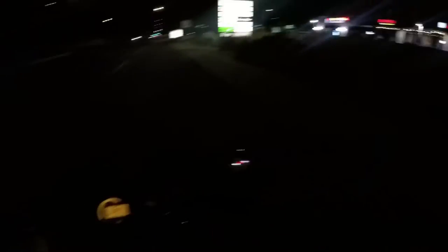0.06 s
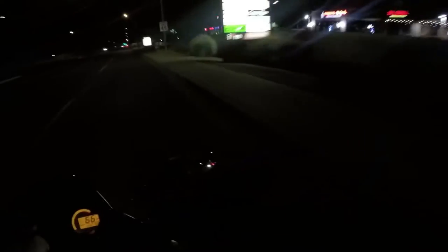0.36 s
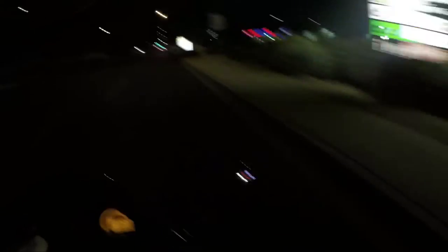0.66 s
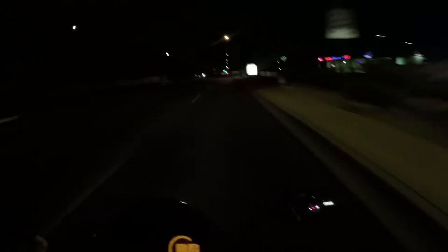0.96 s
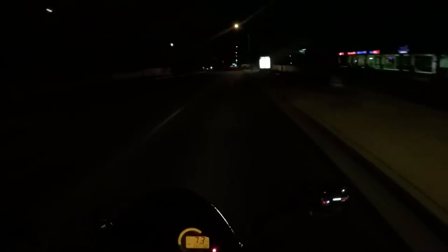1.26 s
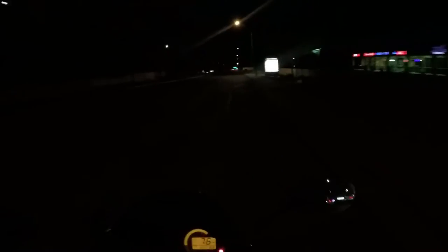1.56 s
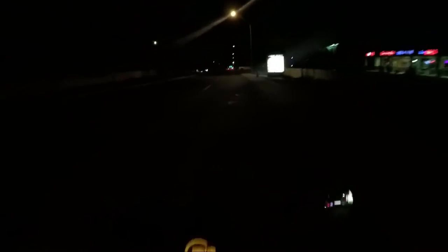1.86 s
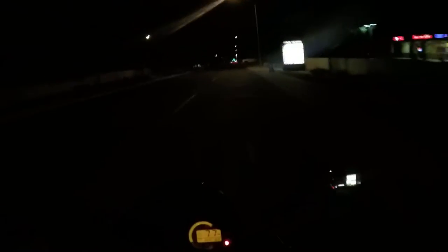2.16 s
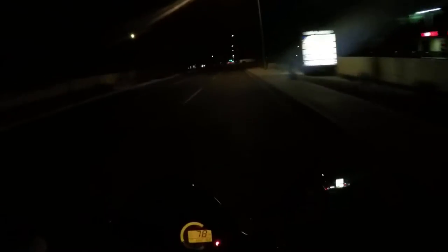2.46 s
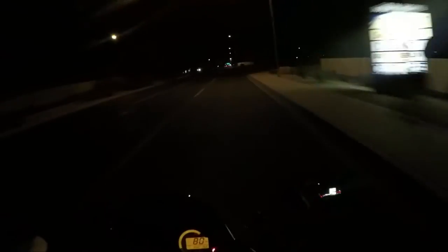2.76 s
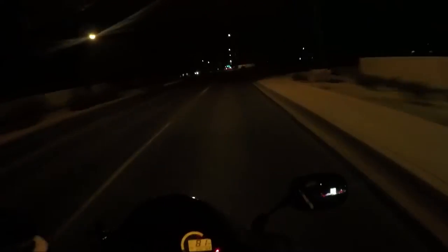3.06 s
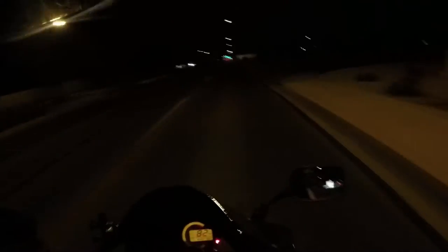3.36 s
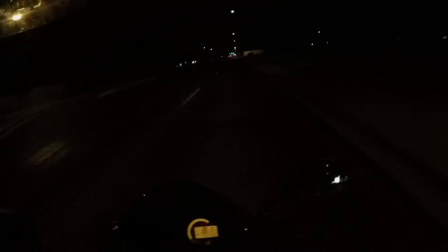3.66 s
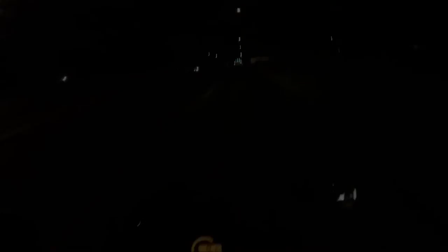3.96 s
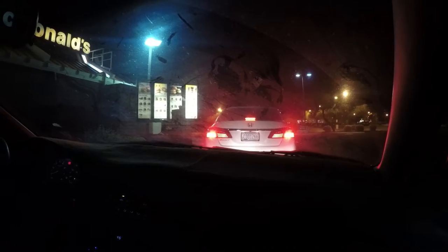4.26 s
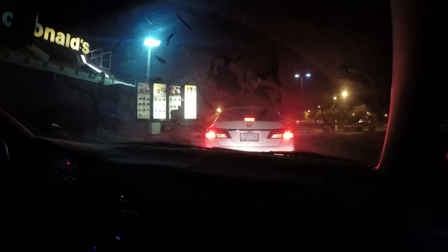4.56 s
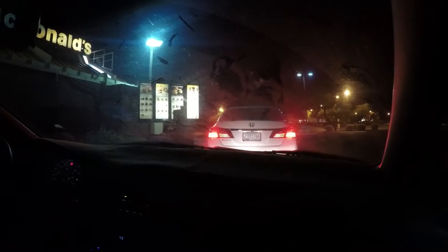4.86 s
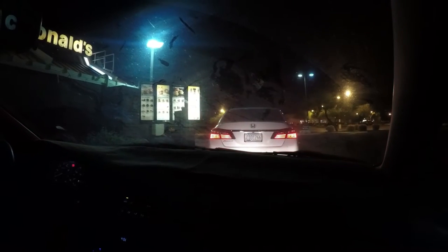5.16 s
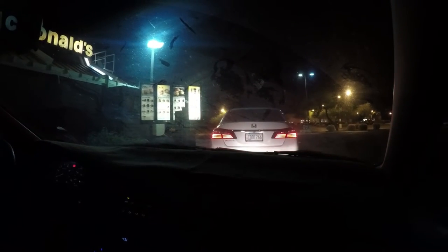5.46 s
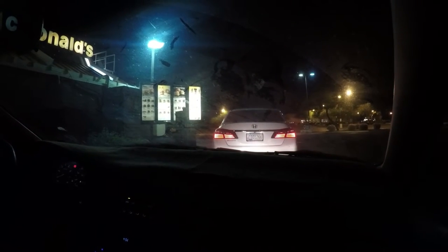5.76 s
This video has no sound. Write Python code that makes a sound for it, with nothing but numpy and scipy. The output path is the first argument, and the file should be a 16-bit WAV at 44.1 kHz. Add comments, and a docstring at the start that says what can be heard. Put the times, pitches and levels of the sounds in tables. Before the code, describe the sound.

Muffled wind buffets over a humming motorcycle shifting up twice, then fades to a much quieter car idling, heard from inside.

```python
"""Night ride, then an idling car

From inside a rider's helmet, muffled and mono: wind buffets, roars and cracks off the edge while a
four-cylinder motorcycle hums from its exhaust and whines from its gears through two upshifts.
The ride fades out and cuts to the inside of a car idling in a queue: firings boom in the cabin
and the vents blow in stereo, with a few soft knocks and a squeak."""
import sys
import numpy as np
from scipy import signal
from scipy.fft import rfft, irfft
from scipy.io import wavfile
from scipy.ndimage import uniform_filter1d, minimum_filter1d

SR = 44100
rng = np.random.default_rng(int(sys.argv[2]) if len(sys.argv) > 2 else 0)


def to_wav(s):
    """Save 16-bit WAV."""
    ch = np.atleast_2d(s).T  # columns
    pcm = np.round(np.clip(ch, -1, 1) * 32767)  # PCM
    wavfile.write(sys.argv[1], SR, pcm.astype(np.int16))


N = 261513
TIME = np.arange(N) / SR
CUT_S = 4.1815  # from the ride to the car

# airy wash of the vents: (frequency [Hz], density [dB])
VENT_COLOUR = [(60, 20), (120, 5.5), (280, 0.5), (500, 0), (740, -3.5), (880, 0), (1100, -0.5), (1400, -3),
               (1550, -9), (1700, -8), (1950, -13), (2400, -14.5), (3000, -16), (3600, -21.5), (4800, -25),
               (6300, -18.5), (7300, -20.5), (8200, -26.5), (10000, -27.5), (14000, -42)]
# soft knocks in the cabin: (time [s], level [dB], pitch [Hz], decay [s])
CABIN_KNOCKS = [(4.211, -13, 98, 0.016), (4.314, -20, 126.4, 0.094), (4.516, -22, 127.6, 0.022),
                (4.885, -27, 213, 0.055), (4.935, -27.5, 178.4, 0.035), (5.355, -21, 172, 0.011),
                (5.35, -26.5, 370, 0.0095), (5.475, -6, 108, 0.01), (5.478, -18, 68, 0.017),
                (5.48, -16.5, 179, 0.02)]
# rumble of body panels shaken by the firings: (frequency [Hz], density [dB])
PANEL_COLOUR = [(20, -31), (78, 0.5), (120, -6), (200, 1), (245, -4), (300, -12.5), (350, -12), (420, -47),
                (800, -44)]
# cabin boom, the last two rows the hum of belt-driven parts: (pitch [x firing rate], level [dB])
BOOM_PARTIALS = [(1, -16.5), (2, -19.5), (3, -39.5), (4, -39), (5, -40.5), (6, -44.5), (7, -40), (8, -51.5),
                 (9, -45.5), (14.5, -57.5), (19, -56.5)]

# airflow over the helmet, growing with road speed: (time [s], level [dB])
AIRFLOW_CURVE = [(0, -5), (1.0, -3.5), (1.45, -1.93), (2.05, -0.5), (2.7, -0.17), (3.35, -1.5), (3.7, -1.5),
                 (4.18, -2)]
# how far the head is turned aside: (time [s], turn [0-1])
HEAD_TURN = [(0, 1), (.48, 1), (.63, 0.78), (.9, 0.81), (.955, 0.45), (1.15, 0.04)]
# gusts and lulls: (time [s], spread [s], roar boost [dB], thump boost [dB], hollow ring [dB])
GUST_CUES = [(.035, 0.039, 9, 1, -29), (.24, 0.026, 7.5, -6, -27), (.47, 0.06, 1.5, 4, -35.5),
             (.68, 0.031, 0, 1.5, -25), (.785, 0.015, 4.5, -1, -28), (.835, 0.023, 7.5, 4, -18.5),
             (.885, 0.019, 3, 0.5, -19.5), (.945, 0.018, 3, -1.5, -17.5), (.997, 0.011, 2.5, 3, -24),
             (1.27, 0.042, 1.5, 2, -31), (1.57, 0.037, 0, 2.5, -37), (1.82, 0.064, .5, -2, -31),
             (2.06, 0.047, 1.7, 1.5, -29), (2.3, 0.028, 1.5, 1.5, -26.5), (2.62, 0.22, 0, 2, -41),
             (2.78, 0.016, 2, -1, -32), (2.88, 0.062, -1, -1, -18.5), (3.02, 0.032, 2.2, -0.5, -23),
             (3.14, 0.041, 4, 1, -23), (3.3, 0.069, 2, 0, -24.5), (3.49, 0.06, 0.5, 0, -19)]
# low thump of large eddies: (frequency [Hz], density [dB])
BUFFET_COLOUR = [(15, -28.5), (30, -7.5), (50, 1), (80, 2), (150, -2.5), (260, -9.5), (330, -10.5),
                 (400, -12.5), (700, -30), (1500, -62)]
# midrange body of the wind: (frequency [Hz], density [dB])
ROAR_COLOUR = [(150, -17), (300, -3), (480, 3.5), (620, 1), (820, 0.5), (1250, 1), (1650, -3), (2200, -4.5),
               (2800, -16), (4000, -21), (8000, -78)]
# bright top of the wind: (frequency [Hz], density [dB])
HISS_COLOUR = [(1200, -10), (2500, 1.5), (3200, -1.5), (4200, -0.5), (5000, -5), (5800, -6.5),
               (6400, -13.5), (7100, -22), (8500, -25), (10000, -38), (12000, -53), (15000, -70.5)]
# eddies shed with the head turned: (frequency [Hz], density [dB])
SIDE_EDDY_COLOUR = [(50, -28), (95, -3), (170, 0.5), (240, -3.5), (370, -7), (450, -11), (550, -10),
                    (700, -15), (1400, -24.5), (2300, -43), (4000, -52.5)]
# hollow of the helmet, rung by gusts: (frequency [Hz], density [dB])
HOLLOW_COLOUR = [(550, -5), (850, -2.5), (1150, -6), (1600, -12.5), (2200, -17.5)]
# dry crackle at the helmet's edge: (frequency [Hz], density [dB])
CRACKLE_COLOUR = [(400, -6.5), (1200, 2), (2500, -6), (5500, -20.5), (7000, -41), (10000, -62.5)]
# flaps of air on the helmet's edge: (time [s], level [dB])
FLAP_CUES = [(.063, -22), (0.13, -13.5), (.172, -18), (0.246, -17), (.257, -24), (0.378, -18),
             (.430, -15.5), (.535, -21), (0.695, -14.5), (.782, -14), (0.825, -11), (.937, -25)]
# crack of a flap: (frequency [Hz], density [dB])
CRACK_COLOUR = [(400, -8), (1000, 4), (1900, 1.5), (2800, -4.5), (4500, -10), (6000, -23.5), (7000, -42),
                (10000, -59.5)]

# gear casing resonances: (centre [Hz], width [Hz], gain [dB])
CASING_MODES = [(4290, 130, -27.5), (4800, 220, -28.3), (5320, 140, -32), (5550, 120, -29.3),
                (6400, 80, -37)]
# meshes that turn in every gear: (pitch [x firing rate], relative level [dB])
CONSTANT_MESHES = [(21.1, -5), (21.95, -3), (23.05, 0), (26.5, -3)]
# one pull for each gear: (start [s], end [s], starting firing rate [Hz], rise [Hz/s],
# starting level [dB], ending level [dB], mesh of the gear pair [x firing rate])
GEAR_PULLS = [(0, 1.62, 219.3, 21, -12, -13.5, 19.1), (1.89, 3.34, 223.4, 14.5, -12, -15, 18.7),
              (3.65, 3.8, 214.6, -12, -18, -17.5, 18.7)]
# exhaust hum: (pitch [x firing rate], relative level [dB])
EXHAUST_HARMONICS = [(1, 0.8), (2, -19), (3, -28), (4, -41)]


def undb(db):
    """Decibels to gain."""
    return 10 ** (np.asarray(db) / 20)


def unit(x):
    """Scale to rms 1."""
    return x / np.sqrt(np.mean(x ** 2))


def curves(rows):
    """Each column after the time as an automation curve."""
    times, *columns = np.transpose(rows)
    return [np.interp(TIME, times, column) for column in columns]


def colour(x, points):
    """EQ by a (Hz, dB) outline with 24 dB per octave skirts, then scale to rms 1."""
    hz, db = np.transpose(points)
    f = np.maximum(np.fft.rfftfreq(N, 1 / SR), 1)
    octaves_outside = np.log2(np.maximum(f / hz[-1], 1)) + np.log2(np.maximum(hz[0] / f, 1))
    eq_db = np.interp(np.log(f), np.log(hz), db) - 24 * octaves_outside
    return unit(irfft(rfft(x) * undb(eq_db), N))


def noise():
    """White noise."""
    return rng.standard_normal(N)


def walk(rate_hz):
    """Smooth random modulation of rms 1, rolled off above rate_hz."""
    f = np.fft.rfftfreq(N, 1 / SR)
    return unit(irfft(rfft(noise()) / (1 + (f / rate_hz) ** 4), N))


def swell(at, spread):
    """A bell-shaped rise and fall."""
    return np.exp(-.5 * ((TIME - at) / spread) ** 2)


def vents(level_db=-35.5, flicker_db=1.5):
    """Fan air reaches the left and right sides from different outlets."""
    return np.array([colour(noise(), VENT_COLOUR) * undb(level_db + flicker_db * walk(24))
                     for _ in range(2)])


def squeak(at=4.872, spread_s=0.013, pitch_hz=2640, level_db=-51, scratch=0.03):
    """One faint, short cabin squeak, scratchy from its jittering pitch."""
    hz = pitch_hz * (1 + scratch * walk(190))
    return undb(level_db) * swell(at, spread_s) * np.sin(2 * np.pi * np.cumsum(hz) / SR)


def knocks(attack_s=0.0026):
    """Each knock rings a damped cabin panel."""
    out = np.zeros(N)
    for at, db, hz, decay in CABIN_KNOCKS:
        age = np.maximum(TIME - at, 0)
        envelope = (1 - np.exp(-age / attack_s)) * np.exp(-age / decay)
        out += undb(db) * envelope * np.sin(2 * np.pi * hz * age)
    return out


def car_idle(firing_hz=25.56, uneven_db=0.97, stumble_rad=0.16, lope_rad=0.16, hunt_db_per_s=0.6,
             panel_db=-35):
    """Slow firings pump the cabin air, growing less even, over a steady rumble of panels."""
    firing = 2 * np.pi * firing_hz * (TIME - CUT_S) + np.pi
    phase = firing + lope_rad * np.sin(firing / 4)  # four cylinders lope in turn
    boom = 0
    for k, db in BOOM_PARTIALS:
        # higher harmonics vary more from firing to firing
        stumble = stumble_rad * k * walk(9.8)
        gain = undb(db + uneven_db * np.sqrt(k) * walk(4.3))
        # and run ahead through the body, which smears each firing
        lead = np.pi / 8 * k * (k - 1)
        boom += gain * np.cos(k * phase + lead + stumble)
    panels = undb(panel_db) * colour(noise(), PANEL_COLOUR)
    hunting = undb(hunt_db_per_s * np.maximum(TIME - CUT_S, 0) * walk(9))
    return np.sqrt(2) * hunting * boom + panels


def crackle(per_s=60, level_db=-38, decay_s=0.0014):
    """Tiny dry bursts where eddies tear off the helmet's edge."""
    chance, size = rng.random((2, N))
    triggers = (chance < per_s / SR) * size ** 2
    bursts = signal.lfilter([1], [1, -np.exp(-1 / (decay_s * SR))], triggers)
    return undb(level_db) * colour(noise() * bursts, CRACKLE_COLOUR)


def flaps(attack_s=0.0012, decay_s=0.0038):
    """Air snaps off the helmet's edge in short, dry cracks."""
    envelope = np.zeros(N)
    for at, db in FLAP_CUES:
        age = np.maximum(TIME - at, 0)
        envelope += undb(db) * (1 - np.exp(-age / attack_s)) * np.exp(-age / decay_s)
    return envelope * colour(noise(), CRACK_COLOUR)


def gusts():
    """Gusts and lulls push the roar and thump up or down (dB) and ring the helmet's hollow (gain)."""
    return sum(np.outer([roar_db, thump_db, undb(ring_db)], swell(at, spread))
               for at, spread, roar_db, thump_db, ring_db in GUST_CUES)


def wind(fast_flutter_db=0.6, slow_flutter_db=0.62, ripple_db=0.2, eddy_db=-10.5):
    """Large eddies thump the helmet; the small ones they shed roar and hiss in the same flutter."""
    air_db, = curves(AIRFLOW_CURVE)
    turned, = curves(HEAD_TURN)
    boost_db, thump_db, ring = gusts()
    # each band rides the airflow and the gusts, and ducks with the head turned
    buffet_db = -13 + 0.65 * air_db + thump_db - 3 * turned
    roar_db = -19 + 1.71 * air_db + boost_db - 1.2 * turned
    hiss_db = -28 + 0.98 * air_db + 0.55 * boost_db - 6.5 * turned
    flutter_db = fast_flutter_db * walk(89) + slow_flutter_db * walk(11)
    buffet = colour(noise(), BUFFET_COLOUR)
    eddies = colour(noise(), SIDE_EDDY_COLOUR)
    roar = colour(noise() * undb(flutter_db + ripple_db * buffet), ROAR_COLOUR)
    hollow = colour(noise() * undb(flutter_db), HOLLOW_COLOUR)
    # with the head turned the flow tears off the edge, and the hiss sputters
    sputter_db = turned * (0.92 * walk(45) + 1.6 * eddies)
    hiss = colour(noise() * undb(1.1 * flutter_db + sputter_db), HISS_COLOUR)
    torn_air = turned * (eddies * undb(eddy_db) + crackle())
    rush = roar * undb(roar_db) + hollow * ring + hiss * undb(hiss_db)
    return buffet * undb(buffet_db) + rush + torn_air


def gear_whine(hz, waver_db=2.0):
    """A gear mesh sings out whenever its pitch crosses a resonance of the casing."""
    resonance = sum(undb(db) / (1 + (2 * (hz - centre) / width) ** 2)
                    for centre, width, db in CASING_MODES)
    return resonance * undb(waver_db * walk(25)) * np.sin(2 * np.pi * np.cumsum(hz) / SR)


def revs(sag_hz_per_s=290, flare_hz=15, reopen_share=0.53, flare_share=0.75):
    """Firing rate, engine level and gear mesh: a steady glide in each gear, upshifts between."""
    rows = []
    for start, end, hz, rise, db, end_db, mesh in GEAR_PULLS:
        if rows:
            # revs sag with the throttle shut, flare as it reopens, then the clutch pulls them in
            last_end, last_hz, last_db, last_mesh = rows[-1]
            shift_s = start - last_end
            shut_s = reopen_share * shift_s
            rows.append((last_end + shut_s, last_hz - sag_hz_per_s * shut_s, last_db, last_mesh))
            rows.append((last_end + flare_share * shift_s, hz + flare_hz, db, mesh))
        rows += [(start, hz, db, mesh), (end, hz + rise * (end - start), end_db, mesh)]
    return curves(rows)


def motorcycle(rough_db=1.07, wander=0.00064, muffler_hz=215, loss_db_per_hz=0.56,
               shield_db=-4, extra_whine_shield_db=-9):
    """The muffler leaves a nearly pure firing note; gears whine at multiples of that pitch."""
    hz, db, mesh = revs()
    turned, = curves(HEAD_TURN)  # turning the head shields both exhaust and gears
    hz = hz * (1 + wander * walk(9.9))
    # the muffler passes less of a note that sags below its resonance
    loss_db = loss_db_per_hz * np.maximum(muffler_hz - hz, 0)
    gain = np.sqrt(2) * undb(db - loss_db + shield_db * turned)
    phase = 2 * np.pi * np.cumsum(hz) / SR
    exhaust = sum(undb(harmonic_db + rough_db * walk(13)) * np.sin(k * phase)
                  for k, harmonic_db in EXHAUST_HARMONICS)
    gears = gear_whine(mesh * hz)
    gears += sum(undb(mesh_db) * gear_whine(k * hz) for k, mesh_db in CONSTANT_MESHES)
    return gain * (exhaust + gears * undb(extra_whine_shield_db * turned))


def scene(fade_s=0.84, tick_db=-22.5, tick_s=0.002):
    """The mono ride fades to nothing; the car interior cuts in with a thin tick of pressure."""
    fade = np.clip((CUT_S - TIME) / fade_s, 0, 1)
    ride = wind() + flaps() + motorcycle()
    tick = -undb(tick_db) * np.exp(-np.abs(TIME - CUT_S) / tick_s)
    cabin = tick + car_idle() + knocks() + squeak() + vents()
    return ride * fade + cabin * (TIME >= CUT_S)


def record(dry, ceiling=0.97, window_samples=161, top_hz=15000):
    """A fast limiter holds down the gusts; a steep low-pass trims the top."""
    safe_gain = np.minimum(1, ceiling / (np.abs(dry).max(axis=0) + 1e-9))
    gain = uniform_filter1d(minimum_filter1d(safe_gain, window_samples), window_samples)
    low_pass = signal.ellip(8, .2, 70, top_hz, fs=SR, output="sos")
    return signal.sosfilt(low_pass, dry * gain)


dry = scene()
out = record(dry)
to_wav(out)
```